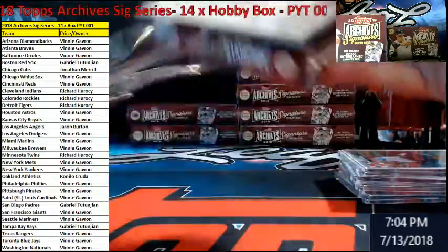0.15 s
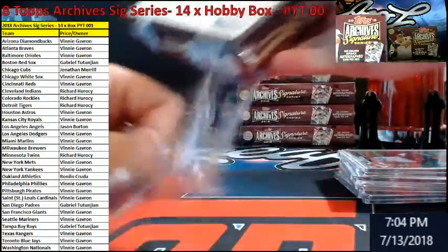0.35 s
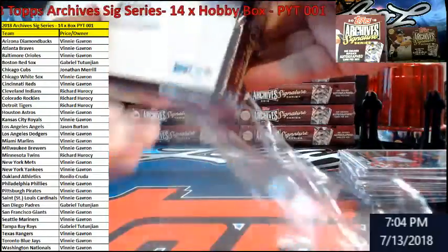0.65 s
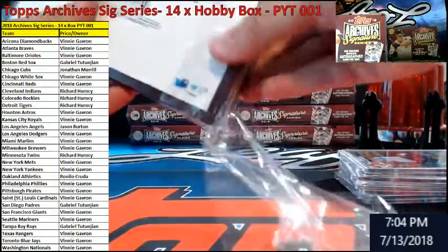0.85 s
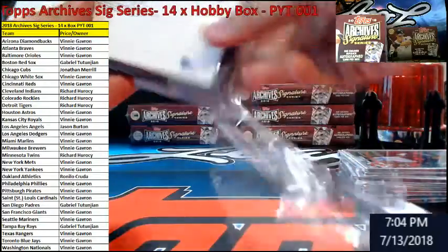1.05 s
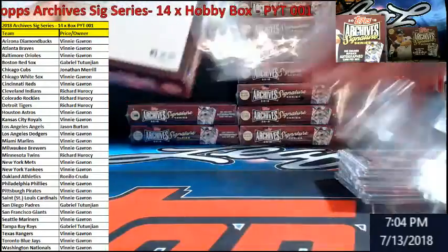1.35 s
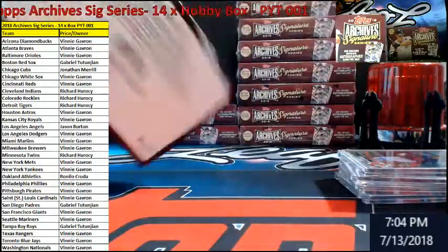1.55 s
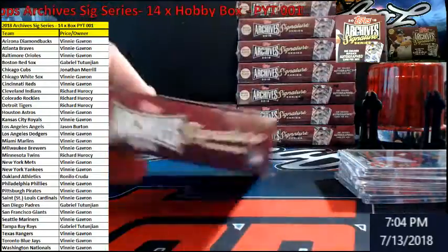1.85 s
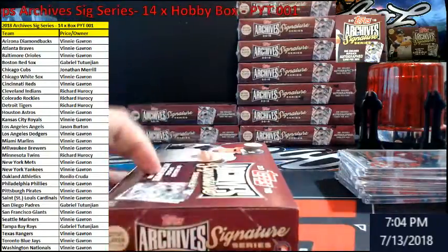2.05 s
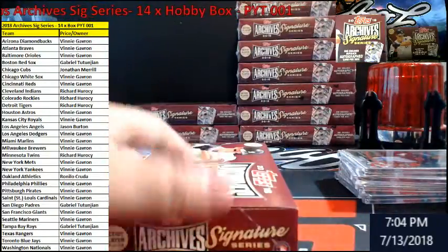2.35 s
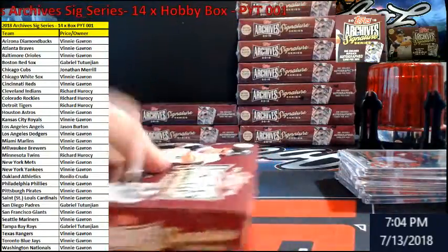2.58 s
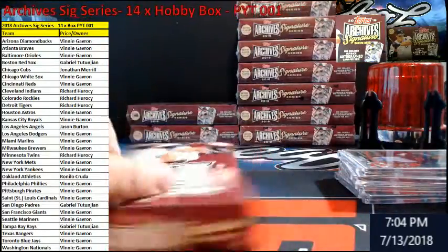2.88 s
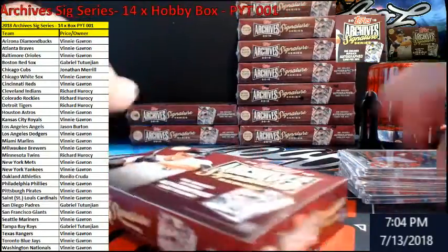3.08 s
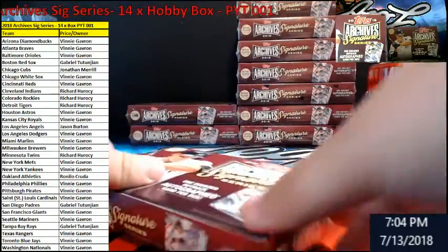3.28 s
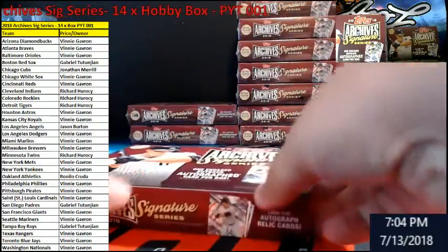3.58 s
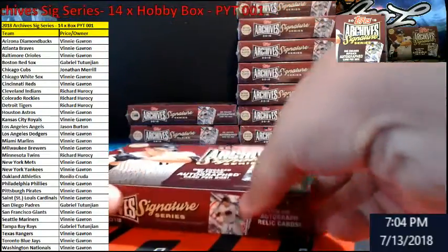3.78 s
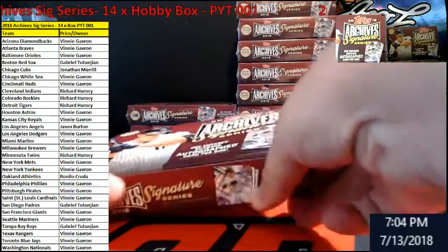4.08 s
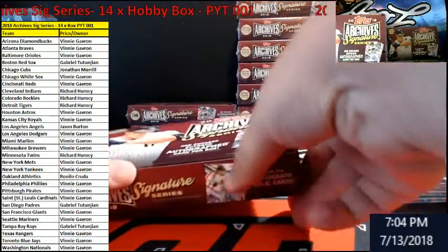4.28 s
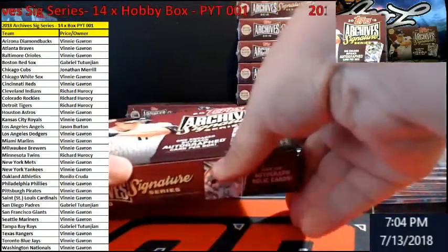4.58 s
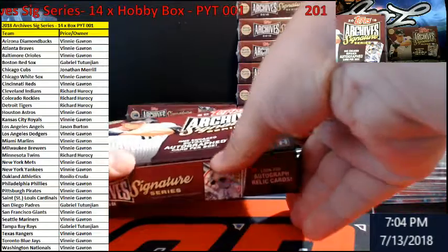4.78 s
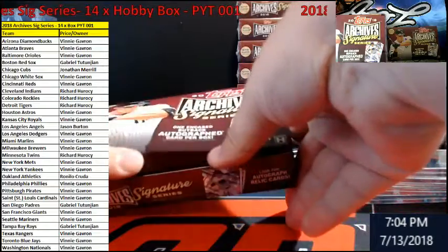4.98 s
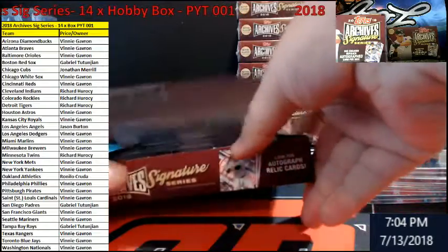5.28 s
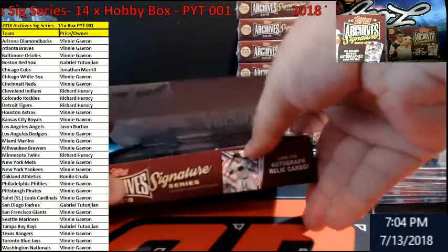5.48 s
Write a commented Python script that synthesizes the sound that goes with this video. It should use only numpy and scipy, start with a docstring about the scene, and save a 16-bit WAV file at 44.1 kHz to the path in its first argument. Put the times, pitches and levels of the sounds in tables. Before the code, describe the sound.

A close, dry microphone in a small room with a faint wavering hush. From 0 to 0.4 s plastic film crinkles brightly in quick uneven bursts with small snaps, then nearly stops, apart from a soft box tap near 0.5 s. At 0.9 s the crackle returns, growing to a loud sharp crack at about 1.18 s, then dying into sparse ticks. The box lands on a padded table at 1.64 s and more heavily at 1.9 s, each a woody thud with a flat slap and brief rattle. From 2.1 to 2.7 s there are soft scuffs, light taps and a tiny faint squeak; then a lull. From 3.2 s fingers slide and tap on hollow card, with a clear knock at 3.77 s and continuing low scrapes. A very loud, clipped hollow pop strikes at 4.92 s, followed by two firm knocks with scraping around 5.1 s, then near quiet with faint rubs.

```python
"""Plastic wrap crinkles and snaps as hands pull it off a small cardboard box: random buckling shakes a sheet.
The box lands twice on a padded table, which rings in damped modes; fingers and flaps tap the hollow box
and excite its modes. Skin and card slide over card by stick-slip, and a fingertip squeaks on the gloss.
Short reflections of a small room and a faint wavering hush surround it all; a close microphone clips
whatever exceeds full scale."""
import sys
import numpy as np
from scipy import signal
from scipy.fft import rfft, irfft, next_fast_len
from scipy.io import wavfile
from scipy.ndimage import map_coordinates

SR = 44100
rng = np.random.default_rng(int(sys.argv[2]) if len(sys.argv) > 2 else 0)


def inscribe(sig):
    """Save sig as 16-bit PCM at rate SR to the path in sys.argv[1].

    A 1-D sig is mono; a 2-D sig holds one channel per row.
    Samples are clipped to [-1, 1] before scaling.
    """
    pcm = np.round(np.clip(np.atleast_2d(sig).T, -1, 1) * 32767)
    wavfile.write(sys.argv[1], SR, pcm.astype(np.int16))


N = 248357  # length in samples

# Pulls on the plastic wrap. Each row: start in seconds, end of the hold in seconds after the start,
# release t60 in seconds, crinkle level in dB, flutter level in dB, resonance of the stretched sheet in Hz.
WRAP_PULLS = [(-0.01, 0.014, 0.13, -32.5, -47.5, 3100), (0.05, 0.046, 0.26, -45, -67.5, 1500),
              (0.122, 0.039, 0.13, -30.5, -42, 1500), (0.163, 0.019, 0.38, -32.5, -44, 2100),
              (0.252, 0.02, 0.11, -38.5, -56, 1100), (0.544, .15, 0.33, -62, -67.5, 750),
              (0.901, 0.06, 0.044, -36.5, -46.5, 1700), (0.98, 0.094, .1, -54.5, -66, 1750),
              (1.043, 0.16, 0.21, -32.5, -42.5, 1300), (1.162, 0.041, .33, -29, -37.5, 1750)]
# The biggest creases of the wrap buckling. Each row: time in seconds, level in dB.
CREASE_SNAPS = [(0.006, -31), (0.14, -25), (0.157, -28.5), (0.171, -31.5), (0.209, -33), (0.219, -30),
                (0.261, -38), (0.346, -40), (0.898, -27), (0.92, -34), (0.96, -34.5), (1.01, -43),
                (1.088, -30), (1.134, -24), (1.17, -24), (1.179, -8)]
# Fingers and flaps striking the box. Each row: time in seconds, body level in dB, centre in Hz,
# edge tick level in dB, level of the push on the table in dB.
BOX_TAPS = [(0.52, -28.5, 520, -54.5, -70), (0.896, -38.5, 594, -51, -79), (1.131, -33.5, 513, -28, -60),
            (1.17, -31, 490, -31, -48), (1.179, -28, 400, -14, -46.5), (2.265, -40, 400, -53, -51),
            (2.397, -37.5, 414, -51, -72), (2.485, -40, 660, -48.5, -48), (2.515, -32.5, 620, -51, -48),
            (2.568, -29.5, 440, -43.5, -36), (3.146, -38, 570, -51, -52.5), (3.38, -38.5, 645, -63, -67),
            (3.417, -28.5, 780, -43.5, -68), (3.518, -35.5, 573, -59, -72), (3.655, -37, 740, -61, -57),
            (3.668, -34, 530, -40, -34.5), (3.68, -30.5, 476, -41.5, -44), (3.752, -29.5, 650, -33, -54),
            (3.769, -17.5, 693, -21.5, -50), (3.802, -27, 590, -33, -47.5), (3.883, -31.5, 600, -61, -37.5),
            (4.096, -39, 560, -46, -62), (4.324, -35, 620, -60, -63.5), (4.398, -47, 484, -42.5, -68.5),
            (4.418, -38.5, 483, -37.5, -47), (4.52, -33, 448, -63, -64), (4.556, -33.5, 500, -33.5, -58),
            (4.586, -33, 492, -34, -60), (4.831, -27, 670, -38, -37), (4.9173, -2, 691, -20, -48),
            (5.111, -16.5, 490, -38.5, -40), (5.165, -14.5, 572, -29, -31)]
# The full box landing on the table. Each row: time in seconds, thud level in dB, thud centre in Hz,
# slap level in dB, lead of the first corner in seconds, level of the corner's knock in dB.
BOX_LANDINGS = [(1.6425, -17, 290, -16.5, 0.0031, -21), (1.899, -11, 404, -18, 0.0076, -17.5)]
# Skin and card sliding on card. Each row: start in seconds, end of the hold in seconds after the start,
# centre in Hz, reference level of the body in dB, edge rasp level in dB, hiss level in dB.
CARD_SLIDES = [(0.674, 0.016, 530, -55.5, -85, -59), (0.737, 0.017, 580, -48.5, -43.5, -37),
               (1.322, 0.014, 750, -54.5, -64.5, -64.5), (1.541, 0.032, 520, -44.5, -60.5, -57),
               (1.846, 0.057, 620, -41.5, -62, -60.5), (1.944, .055, 380, -41.5, -43.5, -36),
               (2.148, .06, 800, -53, -59, -54.5), (2.307, 0.031, 490, -42, -58, -56.5),
               (2.564, 0.0051, 433, -27.5, -48, -31.5), (2.619, 0.025, 674, -48.5, -46, -35),
               (2.709, 0.088, 410, -60, -68, -56), (3.227, 0.1, 578, -42, -59.5, -46.5),
               (3.325, 0.06, 640, -53.5, -83, -50.5), (3.397, 0.047, 760, -39, -75, -66),
               (3.588, 0.019, 735, -39, -61.5, -78), (3.655, .018, 654, -34, -61, -56),
               (3.696, 0.03, 700, -38, -54.5, -72), (3.76, 0.076, 656, -34.5, -43, -43),
               (3.872, 0.0626, 590, -33.5, -71.5, -42.5), (3.959, 0.016, 444, -33, -58.5, -80.5),
               (4.017, 0.018, 495, -39.5, -64, -62), (4.061, .03, 550, -42, -71, -70),
               (4.146, 0.023, 570, -47, -72, -71), (4.403, 0.066, 490, -41.5, -53, -83),
               (4.487, 0.14, 480, -39, -68, -75), (4.63, 0.036, 613, -42.5, -62.5, -66),
               (4.717, 0.049, 576, -31.5, -56.5, -62), (4.762, 0.079, 610, -32, -37.5, -36.5),
               (4.911, 0.071, 805, -31.5, -53, -67.5), (4.987, 0.032, 750, -34, -63.5, -53),
               (5.106, .063, 520, -29, -36, -38), (5.458, 0.017, 690, -55.5, -72, -70),
               (5.592, 0.022, 734, -47, -76, -66)]
# A fingertip squeaking on the gloss. Each row: peak in seconds, rise in seconds, fall in seconds,
# mean pitch in Hz, level in dB.
GLOSS_SQUEAKS = [(1.341, 0.011, 0.02, 920, -59), (1.88, 0.032, .015, 868, -49),
                 (2.171, 0.016, 0.018, 854, -39.5)]
# Modes of the hollow box and its lid. Each row: nominal frequency in Hz, relative level in dB, t60 in seconds.
BOX_MODES = [(145.2, -18, .06), (223.3, -13.5, 0.19), (282, -7, 0.032), (292, -3, 0.043),
             (431, -0.5, 0.045), (494.8, -4.5, 0.05), (586, -8, 0.055), (660, -6.5, .035),
             (771, 1.5, 0.031), (838, -7.5, 0.036), (898, -10, 0.075), (1056, -8.5, .045),
             (1282, -15, 0.045), (1553, -12.5, 0.046), (1634, -13.5, 0.096), (1974, -9.5, 0.081),
             (2383, -14.5, 0.11), (2950, -20.5, 0.038)]
# Modes of the table under the weight of the box. Each row: nominal frequency in Hz, relative level in dB,
# t60 in seconds.
TABLE_MODES = [(139.4, -9, 0.059), (195, -6.5, 0.13), (248.3, -7.5, 0.085), (328, -2.5, 0.099),
               (408.2, 1.5, 0.042), (500, -4.5, 0.055), (570, -13.5, 0.15), (682, -3, 0.049),
               (770, -8.5, 0.06), (1080, -15.5, 0.22), (1415, -11, 0.11), (1814, -14.5, 0.084),
               (2270, -15, 0.07)]
# Spectra of creases, fluttering film, hard edge, flat landing, body scuff, scraped edge, rubbed gloss and
# room hush. Each row: frequency in Hz, relative level in dB per Hz.
CREASE_SPECTRUM = [(1200, -43), (2800, -23), (4000, -10.5), (5300, 0.5), (7000, 3), (8300, -4.5),
                   (10000, -15), (12000, -27.5), (15500, -30)]
FLUTTER_SPECTRUM = [(100, -24.5), (300, -3.5), (700, 5.5), (1200, -8.5), (2100, 1.5), (2800, -4),
                    (3900, 10), (7000, -18), (12000, -42)]
TICK_SPECTRUM = [(200, -17.5), (900, 0.5), (2000, 6.5), (3200, 1.5), (4300, -6.5), (6500, 7.5),
                 (8000, -2.5), (10000, -21), (12500, -36.5), (15500, -43)]
SLAP_SPECTRUM = [(150, -7), (700, 5.5), (1500, -3), (2400, -4.5), (3500, -6.5), (5000, -5.5), (7500, -10),
                 (9500, -34), (13000, -52)]
SCUFF_SPECTRUM = [(90, -20.5), (180, -2.5), (300, -7.5), (450, 1.5), (800, 5.5), (1100, -3), (1600, -16),
                  (3000, -49)]
RASP_SPECTRUM = [(500, -13), (1200, -2.5), (1700, 4.5), (2200, 3.5), (2500, -8.5), (3000, 1), (4200, -4.5),
                 (8000, -39)]
HISS_SPECTRUM = [(2000, -21.5), (4000, -15.5), (5500, 1.5), (7000, 4), (8300, -5.5), (10000, -15),
                 (12000, -34), (15500, -43)]
HUSH_SPECTRUM = [(25, -18), (60, -11.5), (100, -13), (160, 0), (250, -7.5), (450, -9.5), (800, -15.5),
                 (1300, -19), (3000, -25.5), (5500, -23.5), (7500, -23.5), (9500, -36.5), (12000, -44),
                 (15500, -48)]
# Decay of the room's reflections. Each row: frequency in Hz, t60 in seconds.
ROOM_DECAY = [(100, 0.41), (300, 0.13), (800, 0.22), (2000, 0.048), (6000, 0.096), (12000, 0.053)]

# wrap
PULL_ATTACK_S = 0.005
FLUTTER_DIES = 0.47  # the sheet stills sooner than its creases: ratio of their releases
SETTLE_DB, SETTLE_T60_S = -23.5, 1.4  # slack film goes on ticking after a pull, relative to its crinkle
# the dropped film slowly uncrumples: start, hold, decay, level
DROPPED_S, UNCRUMPLE_S, UNCRUMPLE_T60_S, UNCRUMPLE_DB = 1.24, 1.61, 1.4, -67
# taps
CONTACT_S = 0.0004  # contact time when tick and body are equally strong
SOFTER_DB = 14.5  # the contact time doubles each time the tick is this much weaker than the body
DENT_DB, DENT_T60_S = -5, 0.018  # card under the finger gives and springs back, relative to the body
# slides
SLIDE_ATTACK_S, SLIDE_T60_S = 0.014, 0.085
CATCH_DB, EASE_DB = -40, 13  # that attack belongs to this rasp; it doubles for every EASE_DB weaker
EDGE_HZ, EDGE_RING_DB = 2700, -4  # a scraped edge rings: nominal pitch and level relative to the rasp
EDGE_SPREAD = 0.5  # scale of the pitch's stray from slide to slide, natural log of frequency
# brushes that go with the taps
BRUSH_DB, BRUSH_RASP_DB, BRUSH_HISS_DB = -23, -30, -31.5  # slide levels for a 0 dB body or tick
BRUSH_GROWS = 0.62  # dB of brush per dB of body or tick
BRUSH_LEAD_S, BRUSH_LEAD_CONTACTS = 0.01, 8.9  # lead before the tap: fixed part, and contact times added
BRUSH_S = 0.0075  # the brush holds this long after the tap
# microphone
MIC_LOW_HZ, TOP_HZ = 97, 15850


def wrap():
    """Random buckling: countless creases give way and excite the stretched sheet's resonance; a few snap."""
    avalanches = amp(2.5 * wobble(rate=250))  # creases give way in little groups
    creases = unit(avalanches * colour(grains(rate=2200, spread_db=3.5), CREASE_SPECTRUM))
    shaking = avalanches * colour(grains(rate=4000, spread_db=5), FLUTTER_SPECTRUM)
    out, pull, slack = np.zeros((3, N))
    for start, hold, release, crinkle_db, flutter_db, sheet_hz in WRAP_PULLS:
        resonance = signal.iirpeak(sheet_hz, 3, fs=SR)
        sheet = signal.lfilter(*resonance, shaking) + 0.18 * shaking
        flutter = effort(start, hold, PULL_ATTACK_S, FLUTTER_DIES * release)
        out += amp(flutter_db) * flutter * unit(sheet)
        crinkle = effort(start, hold, PULL_ATTACK_S, release)
        pull = np.maximum(pull, amp(crinkle_db) * crinkle)
        settling = effort(start, hold, PULL_ATTACK_S, SETTLE_T60_S)
        slack = np.maximum(slack, amp(crinkle_db + SETTLE_DB) * settling)
    dropped = amp(UNCRUMPLE_DB) * effort(DROPPED_S, UNCRUMPLE_S, PULL_ATTACK_S, UNCRUMPLE_T60_S)
    out += np.max([pull, slack, dropped], axis=0) * creases
    return out + snaps()


def snaps():
    """Sudden buckling: a large crease releases a sharp crack and a longer flap of the film."""
    out = np.zeros(N)
    for s, db in CREASE_SNAPS:
        crack = opening(burst(CREASE_SPECTRUM, t60=0.01, rise=0.00005), seconds=0.00083)
        flap = opening(burst(FLUTTER_SPECTRUM, t60=0.036, rise=0.0001), seconds=0.005)
        add(out, s, amp(db) * (crack + amp(-17.5) * flap))
    return out


def taps():
    """Impact excitation: a contact dents the card, rings the box and nudges the table; hard edges tick."""
    out = np.zeros(N)
    for s, db, centre_hz, tick_db, push_db in BOX_TAPS:
        contact = contact_time(db, tick_db)
        body = ring(BOX_MODES, centre_hz, octaves=0.75, scatter_db=3.0, grip=0.02)
        t = np.arange(len(body)) / SR
        swell = 1 - np.exp(-t / contact)
        # a long contact spares the high modes
        softness = signal.butter(2, np.clip(3.6 / contact, 100, SR / 4), fs=SR)
        softened = signal.lfilter(*softness, body * swell)
        dent = np.sin(2 * np.pi * centre_hz * t) * amp(-60 * t / DENT_T60_S)
        push = ring(TABLE_MODES, centre_hz=150, octaves=0.96, scatter_db=6, grip=0.091)
        tick = burst(TICK_SPECTRUM, t60=0.0086 + 6 * contact, rise=contact / 2)
        add(out, s, amp(db) * opening(softened, seconds=0.0065))
        add(out, s, amp(db + DENT_DB) * opening(dent * swell, seconds=0.006))
        add(out, s, amp(push_db) * opening(push * swell, seconds=0.015))
        add(out, s, amp(tick_db) * opening(tick, seconds=0.0028))
    return out


def contact_time(db, tick_db):
    """Contact duration in seconds: the weaker the tick against the body, the softer and longer the press."""
    return CONTACT_S * 2 ** ((db - tick_db) / SOFTER_DB)


def landings():
    """Successive impacts: one corner touches, then the whole face slaps down and the contents rattle."""
    out = np.zeros(N)
    t = np.arange(SR // 4) / SR
    for s, db, centre_hz, slap_db, lead, corner_db in BOX_LANDINGS:
        slap = burst(SLAP_SPECTRUM, t60=0.041, rise=0.00031)
        hits = grains(rate=3800, spread_db=1)[:len(t)]
        rattle = colour(hits * amp(-60 * t / 0.15), SLAP_SPECTRUM)
        add(out, s - lead, amp(corner_db) * thud(centre_hz / 2))
        add(out, s, amp(db) * thud(centre_hz))
        add(out, s, amp(slap_db) * opening(slap, seconds=0.005))
        add(out, s, amp(slap_db - 10.0) * opening(rattle, seconds=0.032))
    return out


def thud(centre_hz):
    """Modal response of the loaded table to one blow."""
    return opening(ring(TABLE_MODES, centre_hz, octaves=1.33, scatter_db=2.5, grip=0.01), seconds=0.013)


def strokes():
    """Stick-slip friction: grains drum and scuff the hollow box, rasp on its edges and hiss on its gloss."""
    slips = unit(grains(rate=830, spread_db=2.5))
    catch = amp(3.7 * wobble(rate=160))  # the surface catches and lets go
    scuff = unit(colour(grains(rate=1200, spread_db=0.5), SCUFF_SPECTRUM))
    edge = unit(catch * colour(grains(rate=3700, spread_db=2.5), RASP_SPECTRUM))
    gloss = unit(catch * colour(grains(rate=24000, spread_db=2.5), HISS_SPECTRUM))
    out = np.zeros(N)
    for start, hold, centre_hz, body_db, rasp_db, hiss_db in CARD_SLIDES + brushes():
        first = round(start * SR)
        span = slice(first, first + SR // 3)
        # strong rasps catch quickly, weak ones ease in
        attack = min(hold, SLIDE_ATTACK_S * 2 ** ((CATCH_DB - rasp_db) / EASE_DB))
        speed = effort(start, hold, attack, SLIDE_T60_S)[span]
        panel = ring(BOX_MODES, centre_hz, octaves=0.28, scatter_db=3.0, grip=0.032)
        drumming = signal.fftconvolve(speed * slips[span], panel / np.linalg.norm(panel))
        add(out, start, amp(body_db - 0.5) * drumming)
        edge_hz = EDGE_HZ * np.exp(EDGE_SPREAD * rng.uniform(-0.78, 1))
        edge_ring = unit(signal.lfilter(*signal.iirpeak(edge_hz, 4, fs=SR), edge[span]))
        rasp = unit(edge[span] + amp(EDGE_RING_DB) * edge_ring)
        surface = amp(body_db - 7.0) * scuff[span] + amp(rasp_db) * rasp + amp(hiss_db) * gloss[span]
        add(out, start, speed * surface)
    return out


def brushes():
    """Friction around an impact: each tap's short slide, as rows like CARD_SLIDES, harsher for hard edges."""
    rows = []
    for s, db, centre_hz, tick_db, _ in BOX_TAPS:
        # a soft finger brushes the card sooner before it lands
        lead = BRUSH_LEAD_S + BRUSH_LEAD_CONTACTS * contact_time(db, tick_db)
        body_db = BRUSH_DB + BRUSH_GROWS * db
        rasp_db = BRUSH_RASP_DB + BRUSH_GROWS * tick_db
        hiss_db = BRUSH_HISS_DB + BRUSH_GROWS * tick_db
        rows.append((s - lead, lead + BRUSH_S, centre_hz, body_db, rasp_db, hiss_db))
    return rows


def squeaks():
    """Nearly periodic stick-slip: skin slipping at an almost regular rate gives a short, unsteady note."""
    out = np.zeros(N)
    for peak, rise, fall, hz, db in GLOSS_SQUEAKS:
        phase = 2 * np.pi * np.cumsum(hz * (1 + 0.015 * wobble(rate=99))) / SR
        note = unit(amp(3 * wobble(rate=360)) * np.sin(phase))
        out += amp(db) * gesture(peak, rise, fall, power=1.5) * note
    return out


def room(x, wet_db):
    """Diffuse reflection: near walls answer with a short tail, drawn afresh for each of 16 equal stretches."""
    out = np.zeros(N)
    for piece in np.array_split(np.arange(N), 16):
        hz, t, z = signal.stft(rng.standard_normal(SR // 3), SR, nperseg=256)
        decay = amp(-60 * t / along(ROOM_DECAY, hz)[:, None])
        tail = signal.istft(z * decay, SR, nperseg=256)[1]
        echo = signal.fftconvolve(x[piece], tail / np.linalg.norm(tail))
        add(out, piece[0] / SR + 0.004, echo)
    return x + amp(wet_db) * out


def hush():
    """Stationary coloured noise: the room's background, slightly wavering in level."""
    noise = unit(colour(rng.standard_normal(N), HUSH_SPECTRUM))
    return amp(-63.0 + 0.34 * wobble(rate=5.9)) * noise


def ring(modes, centre_hz, octaves, scatter_db, grip):
    """Modal decay: the place of contact favours modes near centre_hz and the grip detunes them."""
    t = np.arange(SR // 5) / SR
    hz, db, t60 = np.transpose(modes)[:, :, None]
    hz = hz * np.exp(grip * rng.standard_normal(hz.shape))
    reach = 1 / (1 + (np.log2(hz / centre_hz) / octaves) ** 2)
    strength = reach * amp(db + scatter_db * rng.standard_normal(hz.shape))
    sign = (-1) ** np.arange(len(hz))[:, None]  # neighbouring modes move the panel in opposite ways
    return np.sum(sign * strength * amp(-60 * t / t60) * np.sin(2 * np.pi * hz * t), axis=0)


def burst(spectrum, t60, rise):
    """Transient noise: an exponential rise and decay, then coloured into a short crack."""
    t = np.arange(SR // 8) / SR
    envelope = amp(-60 * t / t60) * (1 - np.exp(-t / rise))
    return colour(rng.standard_normal(len(t)) * envelope, spectrum)


def grains(rate, spread_db):
    """Random point process: tiny slips of uneven size and either sign, on average rate a second."""
    sizes = amp(spread_db * np.minimum(rng.standard_exponential(N), 4))
    return (rng.random(N) < rate / SR) * sizes * rng.choice([-1, 1], N)


def effort(start, hold, attack, t60):
    """Force envelope: a hand movement builds up, holds and dies away exponentially."""
    t = np.arange(N) / SR - start
    return np.clip(t / attack, 0, 1) * amp(-60 * np.clip((t - hold) / t60, 0, 2))


def gesture(peak, rise, fall, power):
    """Velocity envelope: a hand movement picks up, peaks and stops."""
    return np.interp(np.arange(N) / SR, [peak - rise, peak, peak + fall], [0, 1, 0]) ** power


def wobble(rate):
    """Random modulation: a smooth curve shaped by rate random knots a second."""
    knots = rng.standard_normal(int(N * rate / SR) + 4)
    return map_coordinates(knots, [np.arange(N) * rate / SR])


def colour(x, spectrum):
    """Minimum-phase filtering: a causal response with the given spectrum, found by folding its cepstrum."""
    m = 2 * next_fast_len(len(x) // 2 + 4096)
    cepstrum = irfft(np.log(amp(along(spectrum, np.fft.rfftfreq(m, 1 / SR)))))
    cepstrum[1:m // 2] *= 2
    cepstrum[m // 2 + 1:] = 0
    return irfft(rfft(x, m) * np.exp(rfft(cepstrum)), m)[:len(x)]


def along(points, hz):
    """Logarithmic interpolation: read (Hz, value) points on a log frequency axis."""
    f, v = np.transpose(points)
    return np.interp(np.log(hz + 1), np.log(f), v)


def amp(db):
    """Decibel law: level to amplitude gain."""
    return 10 ** (np.asarray(db) / 20)


def unit(x):
    """Mean-square normalisation: scale to rms 1."""
    return x / np.sqrt(np.mean(x ** 2) + 1e-20)


def opening(x, seconds):
    """Energy normalisation: scale a blow to the energy of rms 1 lasting the given seconds."""
    return x / np.sqrt(np.sum(x ** 2) / (seconds * SR))


def add(track, s, sound):
    """Superposition: mix a sound into the track from time s."""
    part = track[max(round(s * SR), 0):][:len(sound)]
    part += sound[:len(part)]


def scene():
    """Superposition of wrap, box and table with their reflections over the hush of the room."""
    blows = room(taps(), wet_db=-11.5) + room(landings(), wet_db=-11.5)
    rubbing = room(wrap(), wet_db=-11.5) + room(strokes() + squeaks(), wet_db=-14)
    return (blows + rubbing + hush())[None]


def record(dry):
    """Band limits and overload: the microphone sheds deep bass, clips at full scale and cuts the top."""
    highpass = signal.butter(3, MIC_LOW_HZ, "highpass", fs=SR, output="sos")
    thin = signal.sosfilt(highpass, dry)
    m = next_fast_len(N + SR // 2)
    hz = np.fft.rfftfreq(m, 1 / SR)
    return irfft(rfft(np.clip(thin, -1, 1), m) * (hz < TOP_HZ), m)[:, :N]


dry = scene()
out = record(dry)
inscribe(out)
```